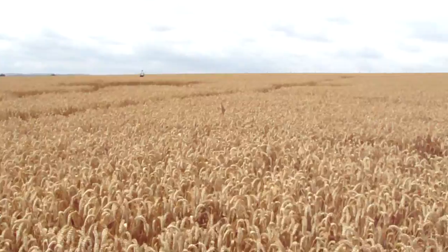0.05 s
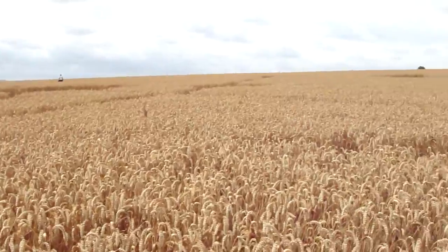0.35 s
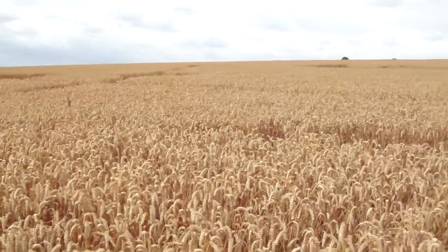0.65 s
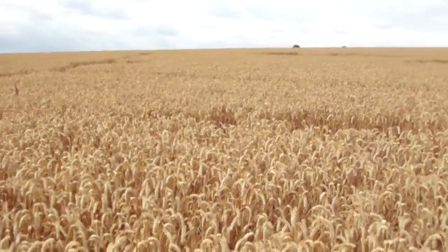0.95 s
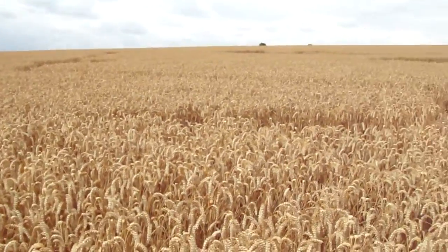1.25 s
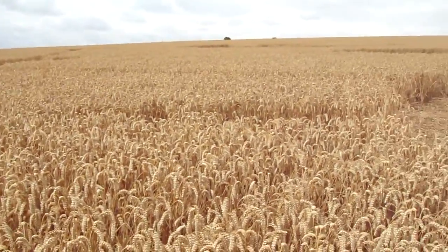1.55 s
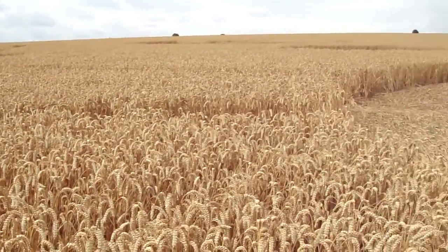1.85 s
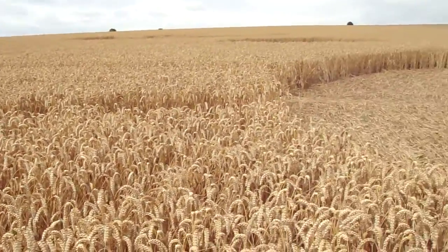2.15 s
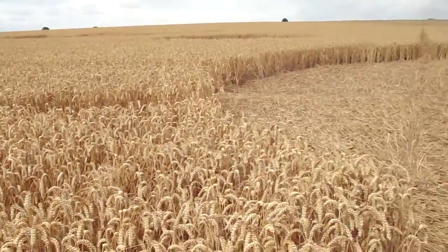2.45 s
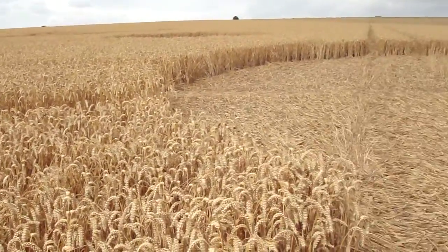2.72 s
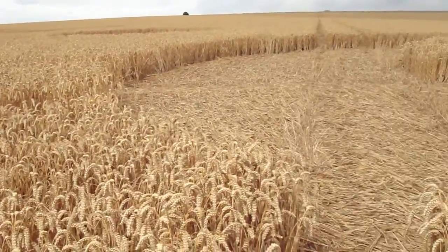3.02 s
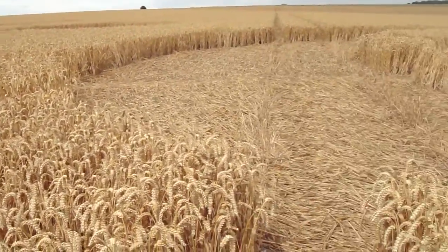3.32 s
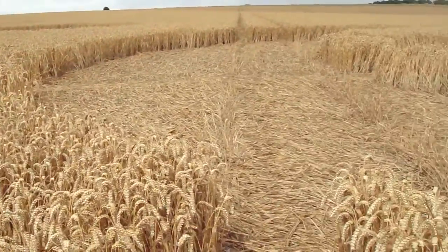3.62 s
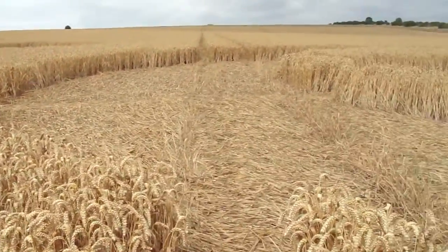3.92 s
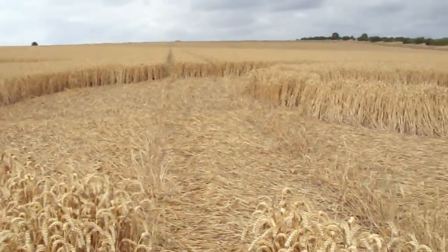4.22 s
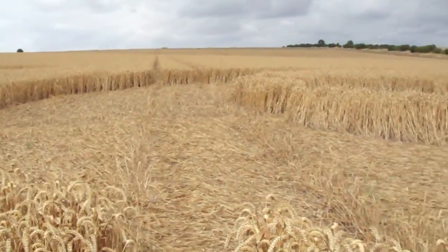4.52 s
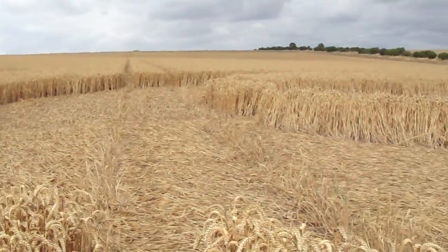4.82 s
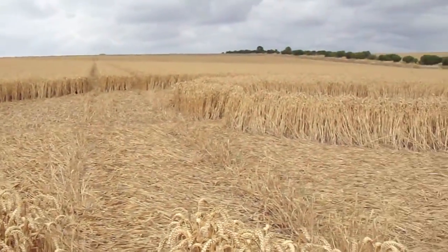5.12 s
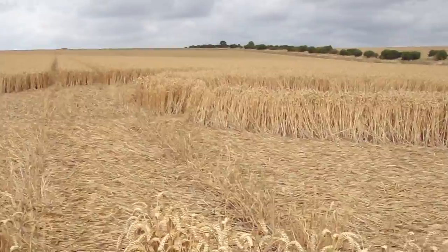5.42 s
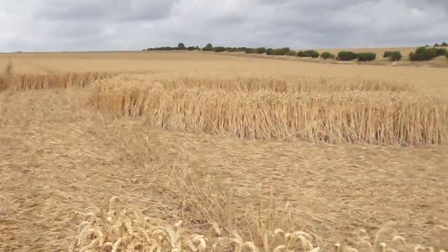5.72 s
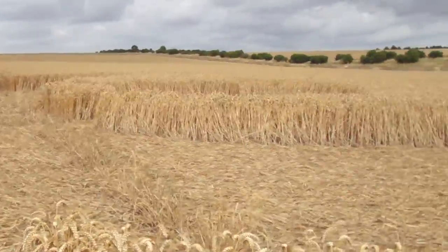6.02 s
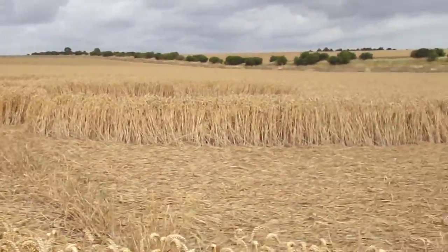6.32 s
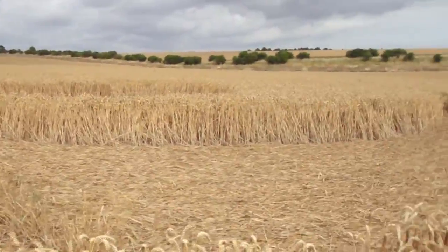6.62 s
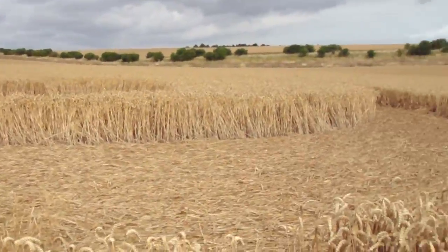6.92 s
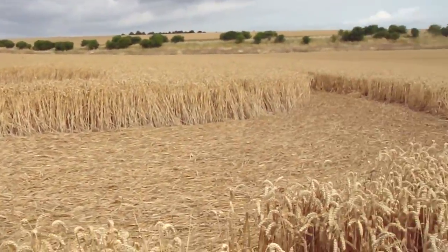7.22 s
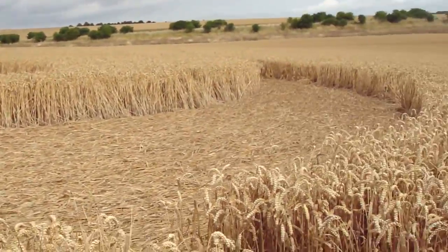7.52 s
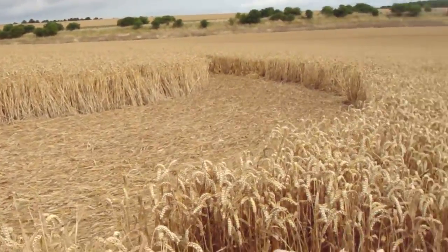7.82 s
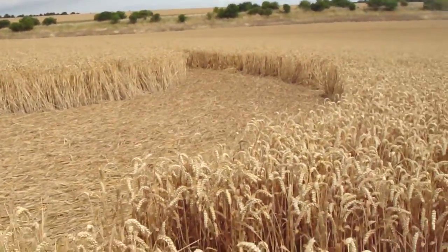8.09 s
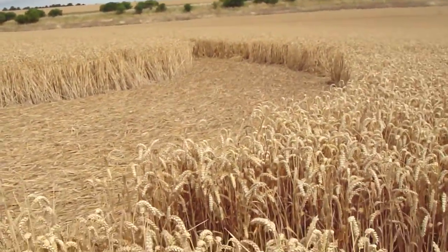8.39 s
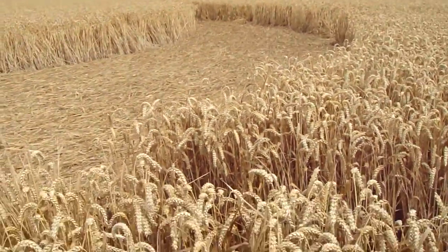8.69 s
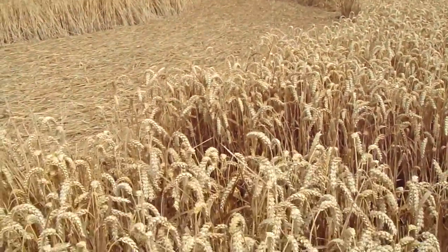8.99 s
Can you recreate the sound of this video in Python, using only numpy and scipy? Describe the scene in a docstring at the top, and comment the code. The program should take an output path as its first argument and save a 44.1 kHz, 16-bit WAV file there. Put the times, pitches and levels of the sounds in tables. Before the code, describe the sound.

Dry wheat hisses and rustles quietly outdoors while gusts of wind pop and rumble right on the microphone. The opening gusts are hard and choppy, with a few cracks, then they thin out to occasional puffs. About two thirds through, the hardest gust slams in, and more fluttering follows as air sweeps through nearby stalks. Close ears scrape together lightly, with the odd tiny straw tick and a faint steady rush far away.

```python
"""Wind gusts flutter on one microphone: trains of short eddies, brighter the harder they blow.
The hardest slam in with a crack, and the limiter briefly ducks the ripe wheat field behind them.
Near dry ears scrape and brush, single straws tick, and gusts comb through the stalks close by.
The whole crop hisses under a far, steady rush with a few hollow swells."""
import sys
import numpy as np
from scipy import signal
from scipy.fft import rfft, irfft, next_fast_len
from scipy.io import wavfile
from scipy.ndimage import uniform_filter1d, map_coordinates

SR = 44100
rng = np.random.default_rng(int(sys.argv[2]) if len(sys.argv) > 2 else 0)


def dump_mix(stems):
    """Bounce the given channels to the path in sys.argv[1] as a 16-bit WAV at rate SR."""
    frames = np.atleast_2d(stems).T  # one column per channel
    limited = np.clip(frames, -1, 1)  # hard clip at full scale
    pcm = np.round(limited * 32767).astype(np.int16)
    wavfile.write(sys.argv[1], SR, pcm)


N = 403515

# far rush: t/s, level/dB
RUSH_LEVELS = [(0, -45), (.4, -49.5), (2.1, -51.5), (2.6, -52), (2.9, -51.5), (3.2, -52.5), (3.45, -51.5),
               (3.8, -49), (4.4, -54), (5.5, -51), (6.3, -52), (9.15, -52.5)]
# hollow swells in the rush: t/s, level/dB, 1/e half-width/s, centre f/Hz
RUSH_SWELLS = [(2.24, -60, 0.093, 1010), (2.58, -53, 0.12, 1020), (3.48, -55, 0.15, 1110),
               (4.1, -72, .15, 1060), (6.8, -54, .1, 1050)]
# crop, before its gains: t/s, field level/dB, near ears level/dB
CROP_LEVELS = [(0.0, -56, -54), (0.2, -56, -54.5), (0.36, -55.5, -55), (1.09, -60.5, -61),
               (1.42, -60, -61.5), (1.88, -62.5, -64), (2.57, -57, -55.5), (3.11, -55, -53),
               (3.62, -56, -55), (5.25, -56, -58.5), (5.5, -56, -55), (6.78, -56, -58), (7.24, -55, -54.5),
               (7.47, -56, -48), (7.92, -52, -47), (9.15, -52.5, -48)]
# near ears brushing together: t/s, level/dB, 1/e^2 half-width/s
EAR_BRUSHES = [(.14, -58, 0.055), (.53, -65, .1), (5.322, -50.5, 0.054), (5.45, -52, 0.055),
               (6.2, -56, 0.21), (7.595, -50, 0.016), (8.193, -52, 0.045), (8.613, -47, .05),
               (9.045, -44, 0.034)]
# straws snapping: t/s, ring level/dB, f/Hz
STRAW_TICKS = [(1.471, -44, 9600), (4.403, -39, 6430), (8.197, -35, 8950), (8.376, -46, 7650)]
# gusts through near stalks: t/s, peak level/dB
STALK_GUSTS = [(7.42, -42.5), (7.61, -39.5), (7.73, -45)]
# slow air pushes: t/s, peak level/dB, 1/e half-width/s
AIR_PUSHES = [(0.393, -20, 0.018), (6.048, -11, 0.014), (7.61, -13, 0.016), (7.658, -4, 0.016)]
# gust fronts, before their gains: t/s, crack level/dB, churn level/dB
GUST_FRONTS = [(0.3815, -31.5, -34), (0.4001, -39, -40), (0.8275, -29.5, -17.5), (1.0112, -32.5, -23.5),
               (1.1803, -49, -13), (1.2718, -37, -26), (1.3221, -31.5, -25), (1.3618, -36, -11.5),
               (1.699, -41, -34), (1.846, -41, -48), (3.7668, -32.5, -35), (5.213, -39.5, -42),
               (6.0358, -26.5, -19.5), (6.0417, -21.5, -6.5), (7.0242, -33, -43), (7.1207, -28, -14),
               (7.195, -33.5, -25), (7.7495, -43.5, -51)]
# light air between gusts: t/s, wind level/dB
BREEZE_LEVELS = [(0, -55), (2.4, -45), (3.3, -61), (4.2, -64), (5.3, -52), (6.4, -64), (7.0, -48),
                 (9.15, -52)]
# fluttering gusts: start t/s, length/s, start wind level/dB, end wind level/dB
MIC_GUSTS = [(0, 0.17, -34.5, -36), (0.241, 0.092, -24.5, -26), (0.356, 0.76, -27.5, -24),
             (1.119, 0.28, -20, -21), (1.414, 0.21, -30.5, -31.5), (1.633, 0.13, -32, -38),
             (1.752, 0.19, -26, -25.5), (1.938, 0.59, -33.5, -44.5), (2.602, 0.41, -38.5, -42.5),
             (3.531, 0.17, -32.5, -40), (3.713, 0.15, -32, -35), (4.469, 0.11, -42, -46),
             (4.661, 0.46, -36.5, -44), (5.149, 0.2, -32.5, -44), (5.296, 0.368, -44, -39.5),
             (5.716, 0.2, -41.5, -37.5), (6.084, 0.089, -23, -29), (6.211, 0.1, -39, -40.5),
             (6.552, 0.095, -44, -39), (6.654, 0.22, -28.5, -40), (7.005, 0.25, -26, -22),
             (7.267, 0.36, -36, -27), (7.591, 0.39, -23, -36.5), (7.97, 0.4, -32.5, -36.5),
             (8.4, 0.3, -37.5, -42)]
# single hard eddies: t/s, wind level/dB, half-power width/s
HARD_EDDIES = [(0.054, -16, 0.011), (0.083, -19.5, 0.01), (0.25, -24, 0.0063), (0.308, -14.5, 0.012),
               (0.367, -16.5, 0.017), (0.398, -11, 0.021), (0.431, -17.5, 0.024), (0.451, -18.5, 0.0069),
               (0.479, -15, 0.012), (0.529, -16, 0.012), (0.56, -15.5, 0.0095), (0.595, -17, 0.006),
               (0.61, -14, 0.014), (0.63, -20, 0.0052), (0.664, -13.5, 0.0093), (0.679, -11, 0.0069),
               (0.721, -18, 0.02), (0.742, -17, 0.01), (0.791, -20.5, 0.013), (0.81, -20.5, 0.023),
               (0.846, -14.5, 0.0087), (0.868, -19.5, .007), (0.926, -17, 0.0076), (0.94, -16.5, 0.011),
               (0.952, -18, 0.012), (1.03, -16.5, 0.0047), (1.041, -10.5, 0.0045), (1.088, -18.5, 0.0099),
               (1.13, -35, 0.011), (1.173, -17, 0.016), (1.2, -13.5, 0.019), (1.219, -11.5, 0.011),
               (1.313, -17, 0.013), (1.415, -20.5, 0.009), (1.431, -11.5, 0.0069), (1.446, -14.5, 0.0087),
               (1.536, -19.5, 0.0099), (1.567, -23.5, 0.012), (1.594, -17, 0.0053), (1.696, -14, 0.011),
               (1.718, -20, 0.005), (1.815, -23, 0.024), (1.847, -19, 0.0073), (1.86, -20.5, 0.014),
               (1.908, -18.5, 0.011), (1.968, -25.5, 0.0086), (2.018, -18, 0.0075), (2.12, -31, 0.011),
               (2.134, -32, .012), (2.235, -24.5, 0.011), (2.29, -23.5, 0.0056), (2.339, -24, 0.0074),
               (2.354, -24, 0.0042), (2.423, -28, 0.012), (2.601, -26.5, 0.007), (2.655, -24.5, 0.006),
               (2.739, -22, 0.0088), (2.791, -29, .008), (2.803, -29, 0.0071), (2.857, -27.5, 0.0058),
               (2.942, -23.5, 0.0061), (3.113, -27.5, 0.0096), (3.56, -32, 0.007), (3.658, -22, 0.0093),
               (3.717, -14.5, 0.01), (3.739, -12, 0.0047), (3.759, -14, 0.014), (3.784, -18, 0.008),
               (3.983, -26, 0.0082), (4.001, -29.5, 0.012), (4.106, -49, .018), (4.32, -47, .018),
               (4.495, -35.5, 0.023), (4.593, -32.5, 0.0087), (4.68, -30.5, 0.0096), (4.756, -22.5, 0.0073),
               (4.774, -20, 0.0099), (4.896, -30, 0.0076), (4.929, -25.5, 0.011), (4.94, -21, 0.011),
               (4.968, -19.5, 0.0089), (5.042, -32, 0.0065), (5.164, -28, 0.01), (5.198, -22, 0.0091),
               (5.215, -19, 0.007), (5.258, -25, .01), (5.528, -20, 0.0096), (5.614, -29, 0.011),
               (5.74, -33, 0.036), (5.853, -30.5, 0.014), (5.976, -33.5, .007), (6.031, -14.5, 0.0047),
               (6.048, -16, 0.02), (6.094, -31, 0.023), (6.163, -25.5, 0.011), (6.281, -30.5, 0.01),
               (6.432, -41.5, 0.015), (6.671, -17.5, 0.012), (6.698, -21, 0.0078), (6.726, -26, 0.017),
               (6.811, -22.5, 0.022), (7.019, -19, 0.014), (7.072, -17.5, 0.021), (7.112, -13.5, 0.0084),
               (7.168, -22, 0.016), (7.194, -18, 0.0084), (7.228, -14.5, 0.0065), (7.283, -24.5, .013),
               (7.37, -21, 0.01), (7.4, -22.5, 0.0045), (7.435, -20.5, 0.0089), (7.479, -24, 0.0073),
               (7.513, -26, 0.0056), (7.551, -25, 0.01), (7.61, -15.5, 0.015), (7.637, -21, 0.014),
               (7.652, -12, 0.0039), (7.71, -18, 0.0069), (7.75, -16.5, 0.0086), (7.777, -24.5, .009),
               (7.878, -21.5, 0.0073), (7.9, -30, .006), (8.018, -20.5, 0.0063), (8.057, -20, 0.0052),
               (8.095, -23.5, 0.0096), (8.12, -19, 0.0054), (8.171, -23.5, 0.0074), (8.223, -32, .008),
               (8.288, -20.5, 0.0038), (8.437, -28, 0.0051), (8.62, -22.5, 0.013), (8.661, -23.5, 0.0072),
               (8.731, -34, .008), (9.104, -18.5, 0.015)]
# turbulence colour, breeze to blast: wind level/dB, 1/e roll-off f/Hz, bass cut f/Hz
WIND_COLOURS = [(-52, 78, 136), (-35, 85, 280), (-25.5, 103, 360), (-18.5, 169.5, 357), (-14, 246, 387)]
# source spectra: f/Hz, relative level/dB
RUSH_SPECTRUM = [(100, -28), (450, -8), (780, -2.5), (1050, 0.5), (1270, -2.5), (1600, -10), (3000, -23)]
FIELD_SPECTRUM = [(30, 3), (150, 5), (500, 1.5), (1400, -3), (2600, -2.5), (4500, -9), (10500, -17.5)]
EAR_SPECTRUM = [(400, -30), (1500, -40), (3000, -0.5), (5000, -0.5), (7500, -0.5), (10500, -2)]
STALK_SPECTRUM = [(150, -26), (600, 7), (1200, 2), (2200, -8), (4000, -21), (10000, -54)]
CRACK_SPECTRUM = [(40, -68), (200, 14.5), (500, 13), (900, 3.5), (1500, -6), (3000, -21), (6000, -34),
                  (11000, -39)]
CHURN_SPECTRUM = [(100, -50), (400, 4.5), (750, 11), (1100, -5.5), (1700, -20.5), (3000, -42), (6000, -45)]

TIME_S = np.arange(N) / SR


def amp(db):
    """Decibels to gain."""
    return 10 ** (np.asarray(db) / 20)


def unit_rms(x):
    """x at rms 1."""
    return x / np.sqrt(np.mean(x ** 2) + 1e-20)


def spectrum_gain(spectrum, hz):
    """Gain at hz, interpolated in dB over log frequency."""
    knots_hz, knots_db = np.transpose(spectrum)
    return amp(np.interp(np.log(hz + 1), np.log(knots_hz + 1), knots_db))


def curves(rows):
    """Per-sample curve for each column after t/s."""
    knots_s, *columns = np.transpose(rows)
    return [np.interp(TIME_S, knots_s, column) for column in columns]


def bell(at_s, width_s):
    """Gaussian envelope, 1/e at width_s from its peak."""
    return np.exp(-((TIME_S - at_s) / width_s) ** 2)


def wobble(rate_hz):
    """Smooth random curve with knots at rate_hz."""
    knots = rng.standard_normal(int(N * rate_hz / SR) + 4)
    return map_coordinates(knots, [TIME_S * rate_hz])


def random_kicks(rate_hz):
    """Impulses of random time and size."""
    return (rng.random(N) < rate_hz / SR) * rng.standard_normal(N)


def filtered(x, response):
    """x through the frequency response(hz)."""
    size = next_fast_len(N + SR // 2)
    hz = np.fft.rfftfreq(size, 1 / SR)
    return irfft(rfft(x, size) * response(hz), size)[:N]


def coloured(x, spectrum):
    """x shaped by a spectrum, at rms 1."""
    return unit_rms(filtered(x, lambda hz: spectrum_gain(spectrum, hz)))


def patchy_noise(depth_db):
    """White noise with random gain patches in time and frequency."""
    bins = signal.stft(rng.standard_normal(N), nperseg=512)[2]
    patches = uniform_filter1d(rng.standard_normal(bins.shape), size=9, axis=0)
    patches = uniform_filter1d(patches, size=14, axis=1)
    return signal.istft(bins * amp(depth_db * unit_rms(patches)), nperseg=512)[1][:N]


def causal_pulse(spectrum, size=2048):
    """Minimum-phase pulse with this spectrum, peak 1."""
    hz = np.fft.rfftfreq(size, 1 / SR)
    cepstrum = irfft(np.log(spectrum_gain(spectrum, hz)))
    cepstrum[1:size // 2] *= 2
    cepstrum[size // 2 + 1:] = 0
    pulse = irfft(np.exp(rfft(cepstrum)))
    return pulse / np.abs(pulse).max()


def far_rush():
    """Soft, distant rush, like a road beyond the field."""
    level_db = curves(RUSH_LEVELS)[0] + 0.24 * wobble(3.4)
    return amp(level_db) * coloured(patchy_noise(depth_db=1), RUSH_SPECTRUM)


def hollow_swells(half_width_hz=140):
    """The far rush gathers into a narrow band and fades."""
    out = np.zeros(N)
    for at_s, db, width_s, centre_hz in RUSH_SWELLS:
        noise = rng.standard_normal(N)
        band = filtered(noise, lambda hz: 1 / (1 + ((hz - centre_hz) / half_width_hz) ** 2))
        out += amp(db) * bell(at_s, width_s) * unit_rms(band)
    return out


def wheat(field_gain_db=6, ears_gain_db=2):
    """Far stalks merge into a hiss; near ears scrape in tiny ticks as they sway and brush."""
    field_db, ears_db = curves(CROP_LEVELS)
    sway = wobble(7.4)
    hiss = coloured(patchy_noise(depth_db=0.6), FIELD_SPECTRUM)
    field = amp(field_db + field_gain_db + 0.66 * sway) * hiss
    ticks = random_kicks(rate_hz=2500)
    scrape = unit_rms(patchy_noise(depth_db=1)) + 0.98 * unit_rms(ticks)
    brushing = sum(amp(db) * bell(at_s, width_s) ** 2 for at_s, db, width_s in EAR_BRUSHES)
    swaying = amp(ears_db + ears_gain_db + 0.5 * sway)
    rustle = np.hypot(swaying, brushing) * amp(0.57 * wobble(35))
    return field + rustle * coloured(scrape, EAR_SPECTRUM)


def straw_ticks(t60_s=0.01, snap_gain=0.54):
    """A hollow straw snaps against its neighbour and rings briefly."""
    out = np.zeros(N)
    age_s = np.arange(SR // 25) / SR
    decay = amp(-60 * age_s / t60_s)
    for at_s, db, hz in STRAW_TICKS:
        ring = np.sin(2 * np.pi * hz * age_s) * decay
        snap = snap_gain * rng.standard_normal(len(age_s)) * decay ** 2
        out[round(at_s * SR):][:len(age_s)] += amp(db) * (ring + snap)
    return out


def stalk_gusts(rise_db_per_s=114, fall_db_per_s=89):
    """Gusts swell and die as they rush through near stalks."""
    swell = np.zeros(N)
    for at_s, db in STALK_GUSTS:
        drop_db = np.maximum(rise_db_per_s * (at_s - TIME_S), fall_db_per_s * (TIME_S - at_s))
        swell += amp(db - drop_db)
    return swell * amp(wobble(28)) * coloured(rng.standard_normal(N), STALK_SPECTRUM)


def air_pushes():
    """A gust's mass leans on the diaphragm: too deep to hear, but it loads the limiter."""
    return sum(amp(db) * bell(at_s, width_s) for at_s, db, width_s in AIR_PUSHES)


def slams(crack_gain_db=23.5, churn_gain_db=4, mean_stall_s=0.001352, rise_s=0.00015, decay_s=0.0068):
    """A gust front shoves the diaphragm to its stop; it snaps back while air churns in the port."""
    shoves, churn = np.zeros(N), np.zeros(N)
    age_s = np.arange(SR // 20) / SR
    burst = np.exp(-age_s / decay_s) * (1 - np.exp(-age_s / rise_s))
    for at_s, crack_db, churn_db in GUST_FRONTS:
        start = round(at_s * SR)
        stall = round(mean_stall_s * rng.uniform(0.8, 1.2) * SR)
        snap_back = amp(crack_db + crack_gain_db)
        shoves[start] -= 0.59 * snap_back
        shoves[start + stall] += snap_back
        churn[start:start + len(burst)] += amp(churn_db + churn_gain_db) * burst
    cracks = signal.fftconvolve(shoves, causal_pulse(CRACK_SPECTRUM))[:N]
    return cracks + churn * coloured(rng.standard_normal(N), CHURN_SPECTRUM)


def gust_power(shed_hz=35, wander_cycles=0.44, scatter_db=2.5, edge_s=0.011, pop_sharpness=6.2):
    """Gusts shed trains of eddies: pops when light, nearer a roar when strong."""
    power = np.zeros(N)
    cycles = shed_hz * TIME_S + wander_cycles * wobble(24)
    offset_db = scatter_db * wobble(shed_hz)
    for start_s, length_s, start_db, end_db in MIC_GUSTS:
        span = slice(int(start_s * SR), int((start_s + length_s) * SR))
        age_s = TIME_S[span] - start_s
        gust_db = np.interp(age_s, [0, length_s], [start_db, end_db])
        edges = np.clip(np.minimum(age_s, length_s - age_s) / edge_s, 0, 1)
        pops = np.abs(np.sin(np.pi * (cycles[span] - cycles[span][0]))) ** pop_sharpness
        lull_db = -6.5 + 0.34 * (gust_db + 42.5)  # floor between pops rises with the gust
        flutter = unit_rms(pops + amp(lull_db))
        power[span] += (edges * flutter * amp(gust_db + offset_db[span])) ** 2
    return power


def eddy_power():
    """Single hard eddies thump out of the flutter."""
    power = np.zeros(N)
    for at_s, db, width_s in HARD_EDDIES:
        span = slice(max(int((at_s - 2 * width_s) * SR), 0), int((at_s + 2 * width_s) * SR))
        half_widths = 2 * (TIME_S[span] - at_s) / width_s
        power[span] += amp(db) ** 2 * 0.5 ** (half_widths ** 2)
    return power


def turbulence(kicks, rolloff_hz, cut_hz, sub_hz=75):
    """Pressure kicks lose treble exponentially and ring through the microphone's bass cut; rms 1."""
    def response(hz):
        bass_cut = (1j * hz) ** 2 / (cut_hz ** 2 - hz ** 2 + 1.6j * hz * cut_hz)
        return np.exp(-hz / rolloff_hz) * bass_cut * hz / np.hypot(hz, sub_hz)

    pressure = filtered(kicks, response)
    local_power = uniform_filter1d(uniform_filter1d(pressure ** 2, size=400), size=400)
    levelled = pressure / np.sqrt(np.abs(local_power) + 0.43 * np.mean(pressure ** 2))
    return unit_rms(levelled)


def buffeting(whirls_per_s=1200, knee_db=-24, surge_db_per_db=0.13, wind_filter_hz=100):
    """Each eddy is a volley of small whirls; faster air sheds smaller ones, so louder is brighter."""
    breeze_power = amp(curves(BREEZE_LEVELS)[0] + 0.5 * wobble(24)) ** 2
    wind_db = 10 * np.log10(breeze_power + gust_power() + eddy_power())
    kicks = random_kicks(whirls_per_s)
    steps_db = [row[0] for row in WIND_COLOURS]
    air = np.zeros(N)
    for one_hot, (_, rolloff_hz, cut_hz) in zip(np.eye(len(steps_db)), WIND_COLOURS):
        crossfade = np.interp(wind_db, steps_db, one_hot)
        air += crossfade * turbulence(kicks, rolloff_hz, cut_hz)
    surge_db = surge_db_per_db * np.maximum(wind_db - knee_db, 0)  # strong eddies surge into the port
    tearing_db = 1.43 * wobble(220)  # ragged flow inside each eddy
    pressure = amp(wind_db + surge_db + tearing_db) * air
    return filtered(pressure, lambda hz: hz / np.hypot(hz, wind_filter_hz))


def scene():
    """The field plus wind on the microphone, mono."""
    field = wheat() + straw_ticks() + stalk_gusts() + far_rush() + hollow_swells()
    return (field + buffeting() + slams() + air_pushes())[None]


def limiter(x, threshold_db, strength, attack_s, release_s):
    """A peak's first cycles slip through; then the gain dives and creeps back."""
    log_cut = strength * np.log(np.maximum(np.abs(x) / amp(threshold_db), 1)) + 1e-9
    release = TIME_S / release_s
    held_cut = np.exp(np.maximum.accumulate(np.log(log_cut) + release) - release)  # decaying peak hold
    pole = np.exp(-1 / (attack_s * SR))
    return x * np.exp(-signal.lfilter([1 - pole], [1, -pole], held_cut))


def record(dry):
    """Limiter, soft clip, then bass cut and band limit."""
    ceiling, low_cut_hz, top_hz = 0.75, 45, 11050
    limited = limiter(dry[0], threshold_db=-13, strength=0.79, attack_s=0.0063, release_s=0.028)
    clipped = limited / (1 + (limited / ceiling) ** 4) ** 0.25
    passband = lambda hz: (hz < top_hz) * hz ** 4 / np.hypot(hz ** 4, low_cut_hz ** 4)
    return filtered(clipped, passband)[None]


dry = scene()
out = record(dry)
dump_mix(out)
```